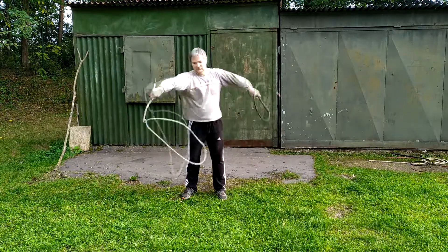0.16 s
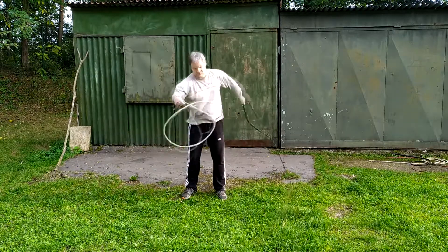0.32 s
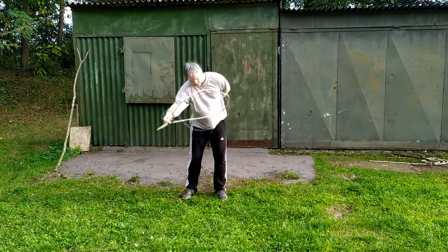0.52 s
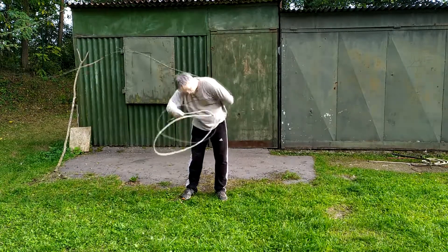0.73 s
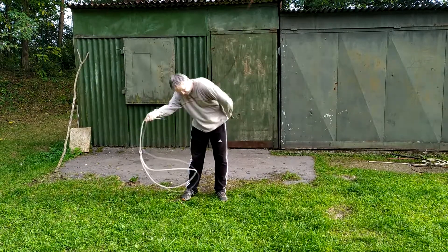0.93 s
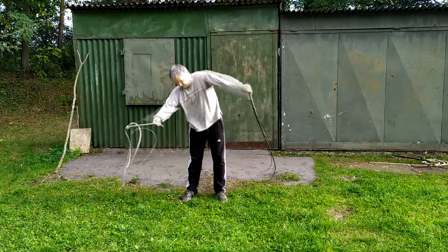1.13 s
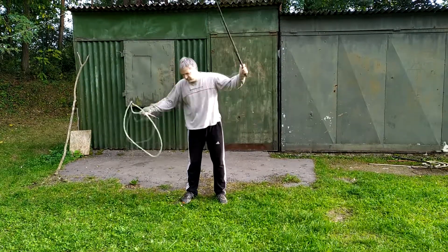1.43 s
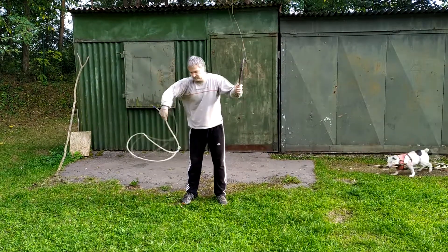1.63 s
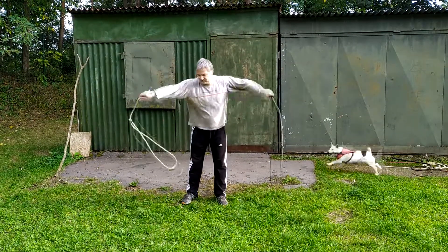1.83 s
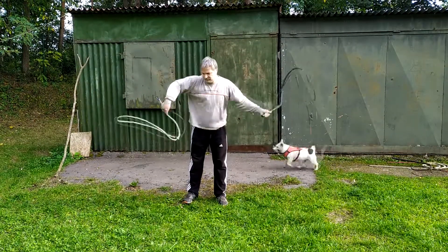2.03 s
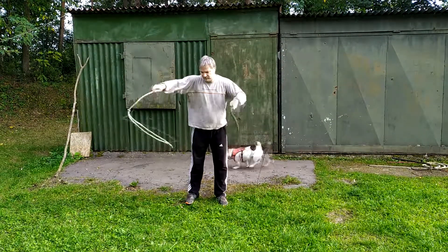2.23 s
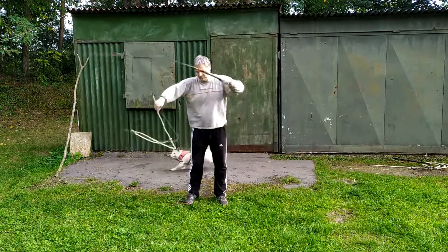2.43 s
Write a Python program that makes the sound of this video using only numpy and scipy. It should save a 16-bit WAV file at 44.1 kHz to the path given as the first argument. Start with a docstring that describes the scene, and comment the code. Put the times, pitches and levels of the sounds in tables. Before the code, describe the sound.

Four sharp, very loud bullwhip cracks outdoors, each slapping back off a metal wall and trees

```python
"""On a lawn in front of sheet-metal sheds, a bullwhip is cracked four times.
Each crack is a coloured noise burst that overloads both microphones: gain change, low swing, saturation.
It returns from the ribbed wall as a short noise blow and scatters among the trees as decaying noise.
Between cracks the thong swishes (gliding noise bands and hiss) and thumps softly (low noise bursts).
Two faint tones ring between the first cracks, over a quiet outdoor noise floor."""
import sys
import numpy as np
from scipy import signal
from scipy.fft import rfft, irfft
from scipy.io import wavfile
from scipy.ndimage import uniform_filter1d

SR = 44100
rng = np.random.default_rng(int(sys.argv[2]) if len(sys.argv) > 2 else 0)


def transcribe(u):
    """Save the signal u as a 16-bit wav file named by the first command-line argument.

    u: samples, shape (n,) or (channels, n), limited to [-1, 1]; the rate is SR.
    q: integer samples, one column per channel.
    """
    v = np.clip(np.atleast_2d(u).T, -1, 1)
    q = np.round(v * 32767).astype(np.int16)
    wavfile.write(sys.argv[1], SR, q)


N = 114660
T, HZ = np.arange(N) / SR, np.fft.rfftfreq(N, 1 / SR)


def amp(db):
    """Decibels to gain."""
    return 10 ** (np.asarray(db) / 20)


def unit(x):
    """Scales to rms 1."""
    return x / np.sqrt(np.mean(x ** 2) + 1e-20)


def read(points, hz):
    """Reads a table on a log-frequency axis."""
    f, value = np.transpose(points)
    return np.interp(np.log(hz + 1), np.log(f + 1), value)


def pan(db):
    """Left gain raised by db, right gain lowered by db."""
    return amp([[db], [-db]])


def peak(at_s, rise_s, decay_s):
    """Envelope that grows exponentially to 1 at a moment and dies away exponentially."""
    before_s, after_s = np.maximum(at_s - T, 0), np.maximum(T - at_s, 0)
    return np.exp(-before_s / rise_s - after_s / decay_s)


# Likeness of left and right. Each row: frequency in Hz, correlation from 0 to 1.
SIDE_LIKENESS = [(60, .88), (250, 0.99), (1000, 0.2), (4000, 0), (16000, 0.22)]
# The same for shocks. Each row: frequency in Hz, correlation from 0 to 1.
SHOCK_LIKENESS = [(60, 0.19), (1000, 0.17), (4000, .3), (16000, .1)]


def noise(spectrum, likeness=SIDE_LIKENESS, grain_db=0):
    """Stereo noise of rms 1, coloured by a spectrum; grain_db makes the sample levels uneven."""
    grain = amp(grain_db * rng.standard_normal((2, N)))
    a, b = rfft(rng.standard_normal((2, N)) * grain)
    c = np.clip(read(likeness, HZ), -1, 1)
    sides = np.array([a, c * a + np.sqrt(1 - c ** 2) * b])
    return unit(irfft(sides * amp(read(spectrum, HZ)), N))


def blows(rows, spectrum, rise_s, likeness):
    """Short bursts cut from one coloured noise by sharp envelopes."""
    level = sum(amp(db) * peak(at_s, rise_s, decay_s) for at_s, db, decay_s in rows)
    return noise(spectrum, likeness) * level


# Outdoor floor spectrum. Each row: frequency in Hz, relative density in dB per Hz.
AIR_SPECTRUM = [(20, -42), (55, 0.65), (90, 0.48), (150, -11), (400, -12), (700, -18), (1500, -26),
                (4000, -29), (10000, -30), (16000, -36)]
AIR_RMS_DB = -61.5


def outdoor_air():
    """Still outdoor air: steady noise, strongest in the bass."""
    return amp(AIR_RMS_DB) * noise(AIR_SPECTRUM)


# Faint tones. Each row: frequency in Hz, rms level in dB at the envelope peak.
RING_TONES = [(598, -71), (930, -69)]
RING_AT_S, RING_RISE_S, RING_DECAY_S, RING_END_S = 0.74, 0.015, 0.43, 1


def ring():
    """Two faint sines of fixed pitch that fade, then stop smoothly."""
    ending = (1 - np.tanh((T - RING_END_S) / RING_RISE_S)) / 2
    level = peak(RING_AT_S, RING_RISE_S, RING_DECAY_S) * ending
    return level * sum(amp(db) * np.sqrt(2) * np.sin(2 * np.pi * hz * T) for hz, db in RING_TONES)


# Soft thumps of the thong. Each row: peak time in seconds, level in dB, decay in seconds.
THUMP_EVENTS = [(1.307, -33, .007), (2.368, -33, .005)]
# Thump spectrum. Each row: frequency in Hz, relative density in dB per Hz.
THUMP_SPECTRUM = [(30, -14), (80, 10), (140, 3.5), (250, 2.5), (430, -1), (700, -20.5), (2000, -24),
                  (16000, -52)]
THUMP_RISE_S = .003


def thumps():
    """Soft blows of the thong: short, mostly low noise bursts."""
    return blows(THUMP_EVENTS, THUMP_SPECTRUM, THUMP_RISE_S, SIDE_LIKENESS)


# Passes of the thong. Each row: centre in seconds, Gaussian width in seconds, start pitch in Hz,
# end pitch in Hz, whistle level in dB, hiss level in dB, whistle bandwidth per pole in Hz.
SWISH_EVENTS = [(.04, 0.028, 292, 304, -86, -65, 300), (.15, .06, 400, 605, -62.5, -63, 613),
                (0.227, 0.012, 440, 660, -50, -53.5, 400), (0.523, 0.0092, 1213, 1093, -47.5, -57, 800),
                (0.736, 0.014, 950, 893, -47.5, -51, 203), (0.781, 0.033, 518.6, 419, -57.5, -70.5, 500),
                (1.01, .015, 382, 392, -74, -61.5, 393), (1.122, .0075, 830, 1020, -42, -46, 240),
                (1.345, 0.029, 828, 783, -51.5, -61, 130), (1.417, 0.011, 710, 760, -46.5, -51, 100),
                (1.636, 0.017, 1800, 1710, -69, -58.5, 254), (1.759, 0.013, 540, 600, -63, -72.5, 130),
                (1.827, 0.034, 352, 457, -59, -51, 400), (1.939, 0.012, 180, 170, -44, -66, 80),
                (2.054, 0.015, 352, 218, -48.5, -53, 258), (2.334, 0.013, 387, 510, -48, -49, 201),
                (2.361, 0.0032, 868, 1000, -36.5, -40, 397)]
# Hiss spectrum. Each row: frequency in Hz, relative density in dB per Hz.
HISS_SPECTRUM = [(500, -13), (2000, 2.5), (5000, -1), (11000, 2), (16000, -17)]


def swishes():
    """Eddies behind the moving thong: a fuzzy whistle of gliding pitch, and hiss."""
    out, hiss = np.zeros((2, N)), noise(HISS_SPECTRUM)
    air = rng.standard_normal((3, N)) + 1j * rng.standard_normal((3, N))
    turbulence = air[:2] + air[2]  # the third stream is common to both sides
    for at_s, width_s, start_hz, end_hz, whistle_db, hiss_db, spread_hz in SWISH_EVENTS:
        pitch_hz = np.interp(T, [at_s - width_s, at_s + width_s], [start_hz, end_hz])
        pole = np.exp(-np.pi * spread_hz / SR)
        eddies = signal.lfilter([1], np.poly([pole, pole]), turbulence)
        carrier = np.exp(2j * np.pi * np.cumsum(pitch_hz) / SR)
        whistle = unit((eddies * carrier).real)
        passing = np.exp(-.5 * ((T - at_s) / width_s) ** 2)
        out += passing * (amp(whistle_db) * whistle + amp(hiss_db) * hiss)
    return out


GRAIN_DB, FLUTTER_DB = 1, 1.24  # standard deviations
PATCH_DB, PATCH_BINS, PATCH_FRAMES = 1.6, 5, 4


def tail(at_s, spectrum, t60, rise_s):
    """Dense reflections that build up in uneven clusters, each band dying at its own speed."""
    hz, t, bands = signal.stft(noise(spectrum, grain_db=GRAIN_DB), SR, nperseg=256)
    clusters = rng.standard_normal(bands.shape[1:])
    clusters = uniform_filter1d(clusters, PATCH_BINS, axis=0)
    clusters = unit(uniform_filter1d(clusters, PATCH_FRAMES, axis=1))
    decay = np.exp(-np.log(1000) * np.maximum(t - at_s, 0) / read(t60, hz)[:, None])
    x = signal.istft(bands * amp(PATCH_DB * clusters) * decay, SR, nperseg=256)[1][:, :N]
    flutter = unit(uniform_filter1d(rng.standard_normal(N), size=220))
    build_up = 1 - np.exp(-np.maximum(T - at_s, 0) / rise_s)
    return x * amp(FLUTTER_DB * flutter) * build_up


RIPPLE_DB, RIPPLE_STEP_HZ = 2.0, 70


def ripple(x):
    """Fine random colour shared by all echoes of one burst."""
    knots_hz = np.arange(0, SR / 2, RIPPLE_STEP_HZ)
    db = np.interp(HZ, knots_hz, rng.standard_normal(len(knots_hz)))
    return irfft(rfft(x) * unit(amp(RIPPLE_DB * db)), N)


# Wall and near scatter spectrum. Each row: frequency in Hz, relative density in dB per Hz.
ECHO_SPECTRUM = [(60, -25), (200, -19.5), (650, -23), (970, -18), (1350, -17.5), (2200, -5.5), (2800, -5.5),
                 (4300, 1), (7000, -4.5), (10000, -6.5), (13000, -8.5), (16000, -18)]
# Far tail spectrum. Each row: frequency in Hz, relative density in dB per Hz.
FAR_SPECTRUM = [(100, 0), (600, -17.5), (1000, -9.5), (1500, -11.5), (2500, -7.5), (4000, 1), (7000, 0.5),
                (10000, -10), (16000, -34.5)]
# Near scatter decay. Each row: frequency in Hz, time to fall 60 dB in seconds.
NEAR_DECAY = [(200, 0.17), (1000, .4), (2200, 0.39), (4500, 0.36), (9000, .35), (16000, 0.23)]
# Far tail decay. Each row: frequency in Hz, time to fall 60 dB in seconds.
FAR_DECAY = [(200, 1), (1500, 2.09), (4000, 1.37), (8000, 0.95), (16000, 1.7)]
WALL_RISE_S, WALL_DECAY_S, SCATTER_RISE_S, FAR_RISE_S = .005, .010, 0.013, .065
ECHO_PAN_DB = 0.5


def echo(at_s, wall_db, wall_delay_s, scatter_db, far_db, brightness):
    """The ribbed wall, the yard and the distant trees throw a crack back."""
    colour = [(hz * brightness, db) for hz, db in ECHO_SPECTRUM]
    wall_level = amp(wall_db) * peak(at_s + wall_delay_s, WALL_RISE_S, WALL_DECAY_S) * (T > at_s)
    wall = wall_level * noise(colour, grain_db=GRAIN_DB)
    near = amp(scatter_db) * tail(at_s, colour, NEAR_DECAY, SCATTER_RISE_S)
    far = amp(far_db) * tail(at_s, FAR_SPECTRUM, FAR_DECAY, FAR_RISE_S)
    return pan(ECHO_PAN_DB) * ripple(wall + near + far)


# The yard's answer to each crack. Each row: wall echo in dB, wall delay in seconds, near scatter in dB,
# far tail in dB, frequency factor on the wall and near scatter spectrum.
YARD_ANSWERS = [(-5.5, 0.029, -4.5, -33, 0.95), (-33, 0.025, -6.5, -32.5, 1.17),
                (-10.5, .030, -7.5, -36, 1.026), (-10, .030, -11, -29.5, 1.067)]


def echoes():
    """Every crack comes back from the same yard."""
    return sum(echo(row[0], *answer) for row, answer in zip(CRACK_EVENTS, YARD_ANSWERS))


# Side shocks and hard reflections. Each row: peak time in seconds, level in dB, decay in seconds.
SNAP_EVENTS = [(1.135, -20, .0015), (1.8915, -10, .0016), (2.1318, -7, .002), (2.144, -20, .002)]
# Snap spectrum. Each row: frequency in Hz, relative density in dB per Hz.
SNAP_SPECTRUM = [(60, -8), (300, 5), (620, -3.5), (950, 9.5), (1400, -7), (2200, 1), (4000, -4),
                 (8000, -4.5), (16000, -28)]
SNAP_RISE_S = 0.0005


def snaps():
    """Separate side shocks and hard reflections near the cracks: very short noise bursts."""
    return blows(SNAP_EVENTS, SNAP_SPECTRUM, SNAP_RISE_S, SHOCK_LIKENESS)


# Shock spectrum. Each row: frequency in Hz, relative density in dB per Hz.
SHOCK_SPECTRUM = [(40, -14), (150, -7.5), (400, 0), (620, -14), (950, -0.5), (1350, -9.5), (1900, 2),
                  (2600, -7), (3600, 3.5), (6000, -2), (10000, -2.5), (16000, -14.5)]
SHOCK_PAN_DB = -0.26


def crack(at_s, shock_db, hold_s, decay_s, lead_db, lead_s):
    """The tip tears up to speed and sheds shocks: rising noise, then a held and decaying burst."""
    lead_in = amp(lead_db) * peak(at_s, lead_s, lead_s)
    burst = amp(shock_db) * np.exp(-np.maximum(T - at_s - hold_s, 0) / decay_s)
    level = np.where(T < at_s, lead_in, burst)
    return pan(SHOCK_PAN_DB) * level * noise(SHOCK_SPECTRUM, SHOCK_LIKENESS)


# Whip cracks. Each row: start in seconds, shock level in dB, shock hold in seconds, shock decay in seconds,
# lead-in level in dB, lead-in rise in seconds.
CRACK_EVENTS = [(.2424, -3.5, .0015, .0045, -11, .0013), (1.1428, -1.5, .0055, .0042, -15, .0045),
                (1.8704, 0, .0012, .0018, -14, .0019), (2.1281, -3, .002, .0042, -20, .0028)]


def cracks():
    """Direct shocks of the whip."""
    return sum(crack(*row) for row in CRACK_EVENTS)


def scene():
    """Still outdoor air, the moving thong, and the cracks with their echoes."""
    thong = thumps() + swishes()
    return outdoor_air() + ring() + thong + echoes() + snaps() + cracks()


DEAF_AFTER_S, DEAF_EDGE_S, RECOVER_S = .0026, .0004, .0011


def deafness(at_s, length_s, change_db):
    """Gain of a microphone that a shock upsets for some milliseconds."""
    stunned = (1 + np.tanh((T - at_s - DEAF_AFTER_S) / DEAF_EDGE_S)) / 2
    not_recovered = (1 - np.tanh((T - at_s - length_s) / (2 * RECOVER_S))) / 2
    return amp(change_db * stunned * not_recovered)


SWING_HZ, SWING_DECAY_S = 56, 0.015
SWING_RUSH_TURNS, SWING_RUSH_S = 0.62, 0.0027  # extra turns while the swing starts fast


def swing(at_s, db):
    """The low, slowing swing with which an overloaded microphone settles."""
    t = np.maximum(T - at_s, 0)
    turns = SWING_HZ * t + SWING_RUSH_TURNS * (1 - np.exp(-t / SWING_RUSH_S))
    return amp(db) * np.exp(-t / SWING_DECAY_S) * np.sin(2 * np.pi * turns)


# Microphone overload at each crack. Each row: left upset in seconds, left gain change in dB,
# right upset in seconds, right gain change in dB, left swing in dB, right swing in dB.
MIC_OVERLOADS = [(0.004, 4.5, 0.027, -38.5, -14, -7.5), (.012, -7, 0.023, -4.5, -44, -20.5),
                 (.0185, -12, .0185, -18, -12.5, -12.5), (0.009, -3, 0.011, -10.5, -21.5, -9)]
LEFT_LAG_S, CEILING, LOW_CUT_HZ, HIGH_CUT_HZ = .001, .9, 30, 16100


def record(dry):
    """Both microphones change gain and swing at each crack, and saturate; then the band limit."""
    gain, bias = np.ones((2, N)), np.zeros((2, N))
    for (at_s, *_), overload in zip(CRACK_EVENTS, MIC_OVERLOADS):
        left_s, left_db, right_s, right_db, left_swing_db, right_swing_db = overload
        gain *= [deafness(at_s, left_s, left_db), deafness(at_s, right_s, right_db)]
        bias += [-swing(at_s + LEFT_LAG_S, left_swing_db), swing(at_s, right_swing_db)]
    saturated = CEILING * np.tanh((dry * gain + bias) / CEILING)
    low_cut = signal.butter(2, LOW_CUT_HZ, "high", fs=SR, output="sos")
    high_cut = signal.firwin(401, HIGH_CUT_HZ, window=("kaiser", 7), fs=SR)
    return signal.oaconvolve(signal.sosfilt(low_cut, saturated), high_cut[None], "same")


dry = scene()
out = record(dry)
transcribe(out)
```